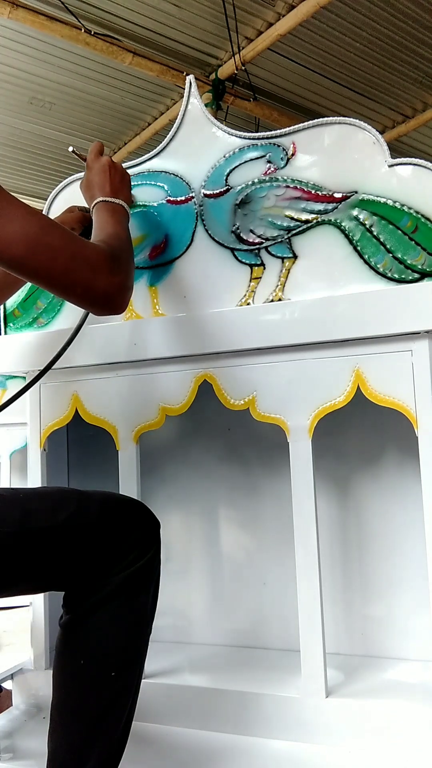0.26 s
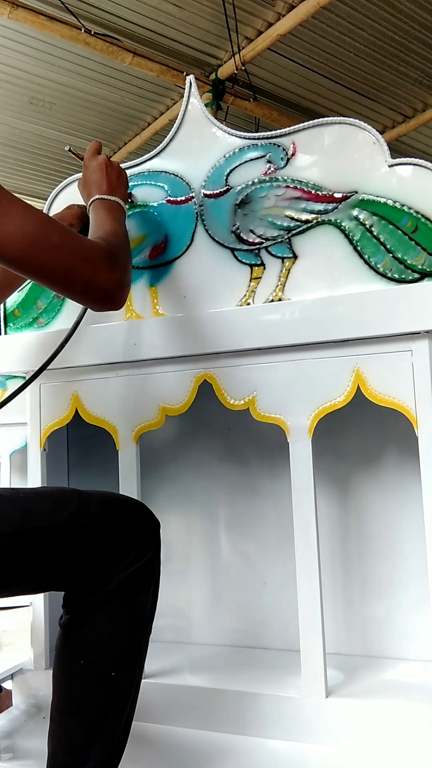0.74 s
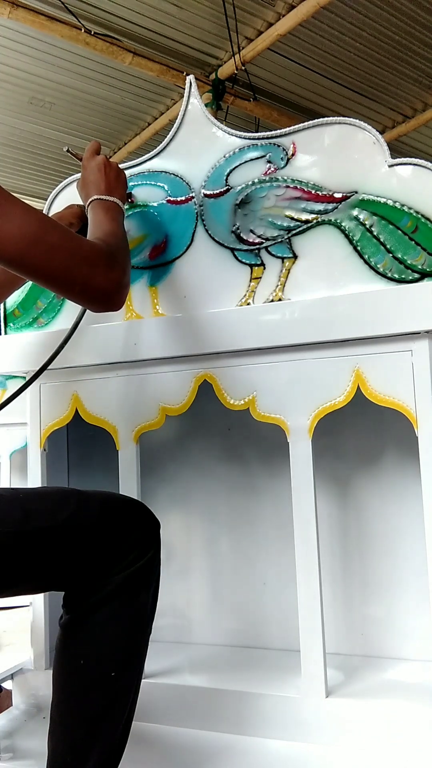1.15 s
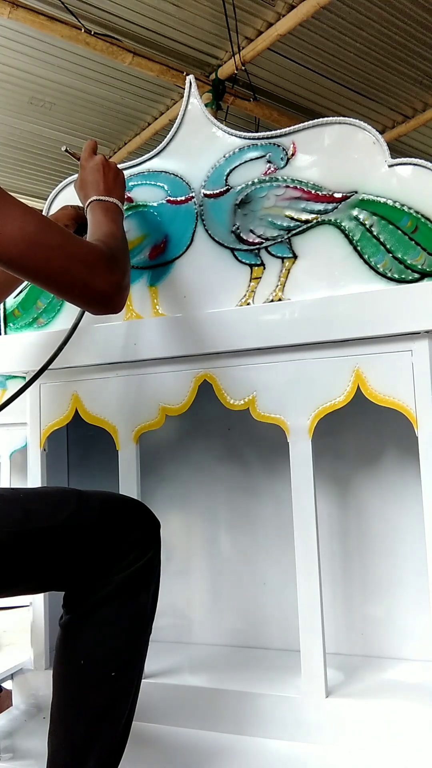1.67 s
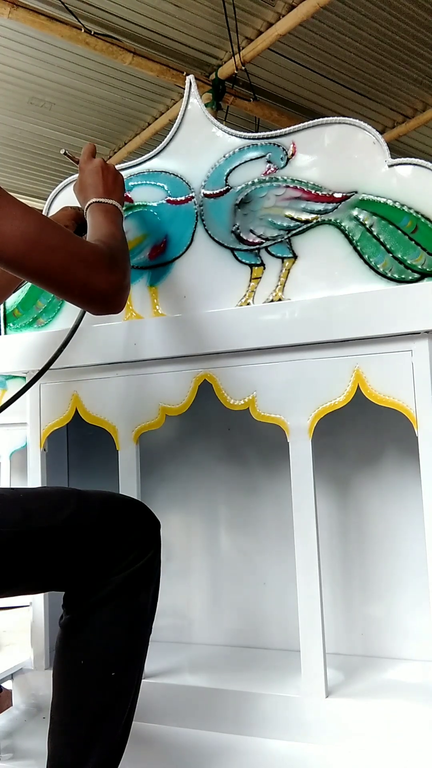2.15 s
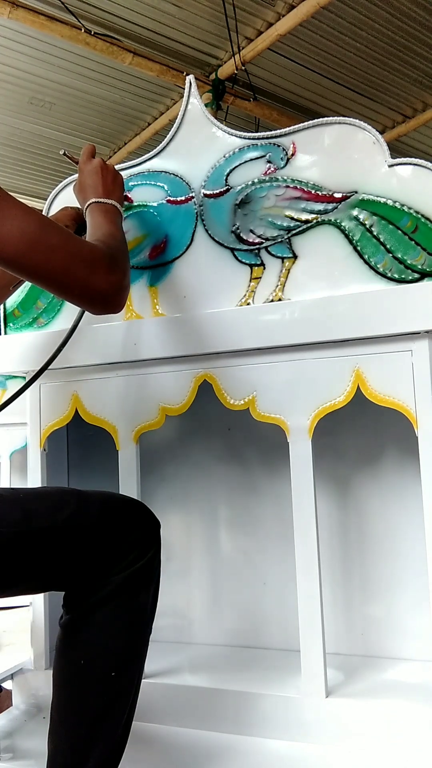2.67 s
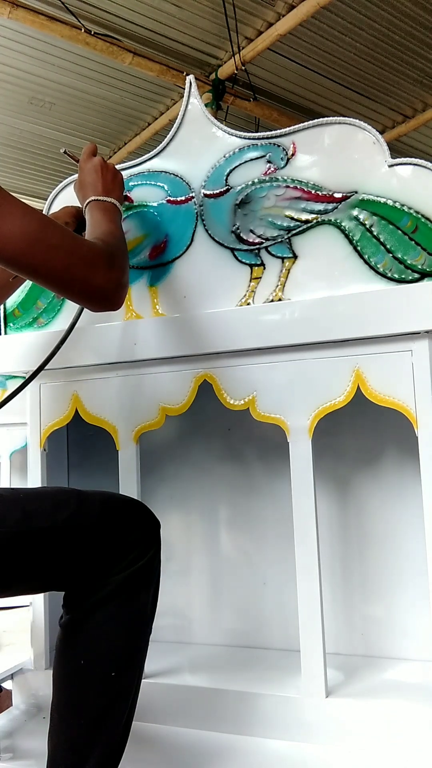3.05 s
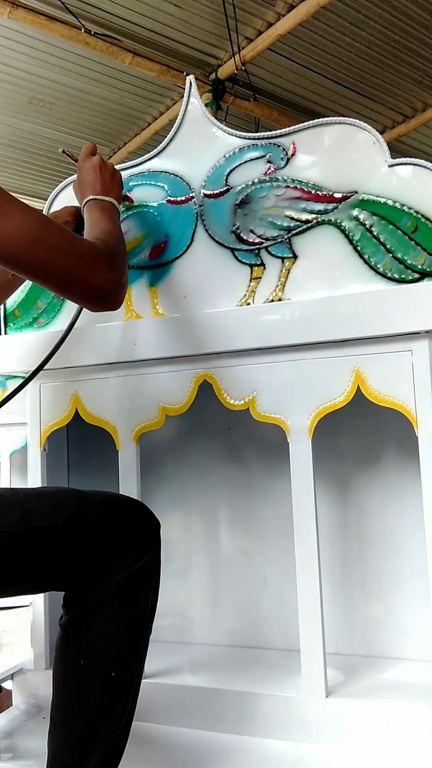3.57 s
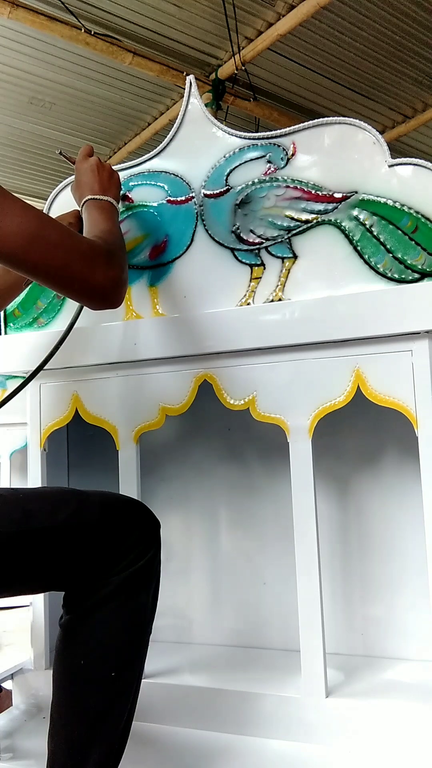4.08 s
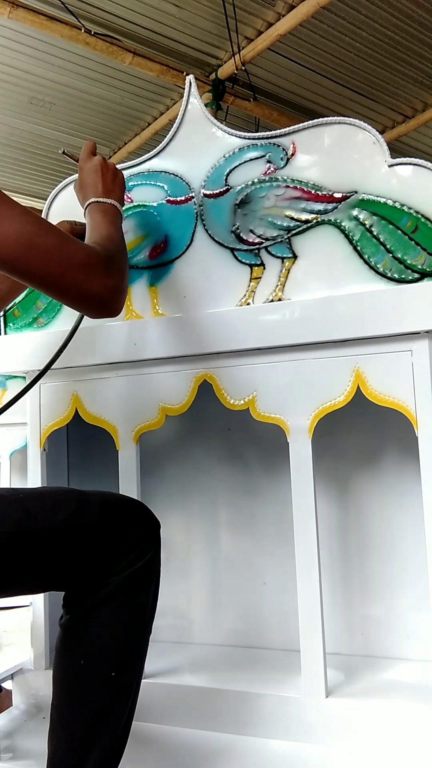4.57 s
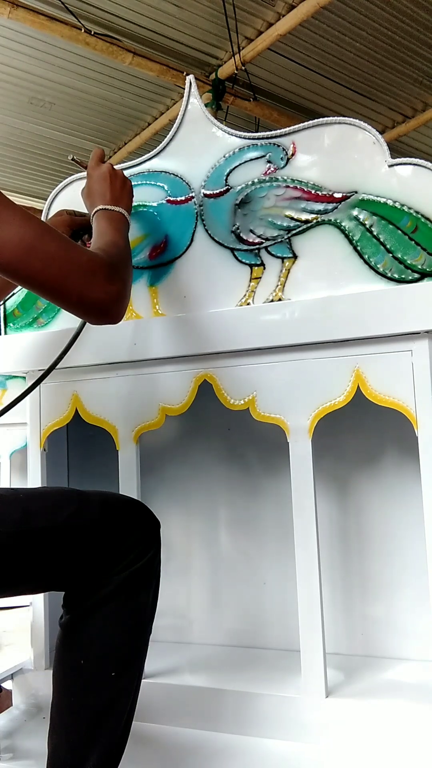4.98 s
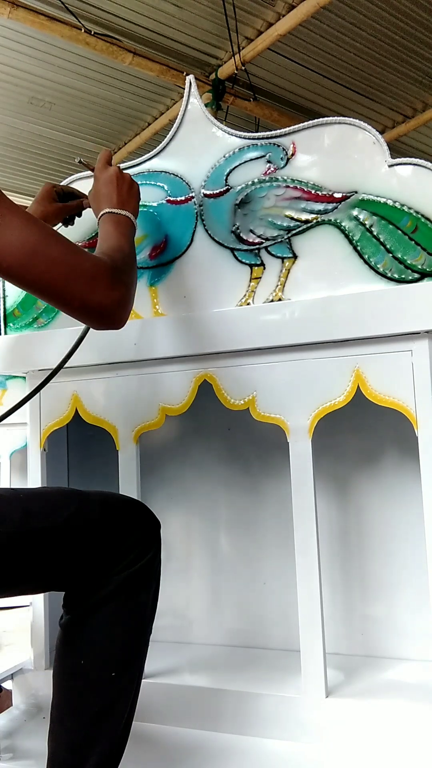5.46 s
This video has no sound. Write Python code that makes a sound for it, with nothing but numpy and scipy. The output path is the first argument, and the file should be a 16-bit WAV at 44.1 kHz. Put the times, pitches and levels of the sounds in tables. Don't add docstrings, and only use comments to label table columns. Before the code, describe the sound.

A small piston compressor drones steadily nearby, a low buzzing hum with fine valve rattle, leaking air and a faint high whine. After nearly a second an airbrush gives a short, even hiss, then stops cleanly. Following a pause, a second longer burst grows brighter and much louder before cutting off. Close stereo pickup at arm's length, under a tin roof, with a very short diffuse tail.

```python
import sys
import numpy as np
from scipy import signal
from scipy.fft import rfft, irfft, next_fast_len
from scipy.io import wavfile
from scipy.ndimage import uniform_filter1d

SR = 44100
rng = np.random.default_rng(int(sys.argv[2]) if len(sys.argv) > 2 else 0)


def digitize_waveform(pressure):
    field = np.atleast_2d(pressure).T
    bounded = np.clip(field, -1, 1)
    quanta = np.round(bounded * 32767).astype(np.int16)
    wavfile.write(sys.argv[1], SR, quanta)


def voltage_ratio(decibels):
    exponent = np.asarray(decibels, float) / 20
    return 10 ** exponent


N = 252693
TIME = np.arange(N) / SR
LONG = next_fast_len(N, True)
FREQ = np.fft.rfftfreq(LONG, 1 / SR)

# [t/s, f/Hz]
SHAFT_RATE = [
    (0.0, 46.1),
    (0.06, 46.12),
    (5.73, 46.08),
]
# [multiple of shaft rate, left level/dB, right level/dB]
PISTON_THUD = [(1, -58, -58), (2, -54, -55), (3, -67, -74), (4, -53, -53), (5, -48, -47), (6, -51, -52),
               (7, -50, -53), (8, -46, -45), (9, -49, -49), (10, -43, -45)]
# [multiple of shaft rate, left level/dB, right level/dB, left lead/rad]
HOUSING_TONES = [(12, -59, -61, 0.9), (13, -51, -57, 0.0), (14, -55, -62, 1.6), (15, -48, -65, -3.0),
                 (17, -57, -59, 0.2), (18, -61, -57, -0.7), (19, -51, -60, 0.5), (21, -48, -59, 2.2),
                 (23, -56, -57, 2.7), (24, -46, -57, 1.1), (25, -52, -50, 0.4), (27, -60, -61, -0.7),
                 (28, -55, -53, 2.1), (29, -52, -54, 1.2), (30, -52, -62, 0.7), (32, -58, -65, 2.1),
                 (33, -58, -61, -0.7), (39, -57, -60, 1.4), (42, -54, -72, 0.9), (47, -62, -61, 1.8),
                 (49, -61, -69, 0.8)]
# [t/s, level change/dB]
HOUSING_SWELL = [
    (0, -5),
    (1, 1.5),
    (2.1, -1),
    (2.6, 3.5),
    (3.3, 6.5),
    (4.2, 5),
    (4.8, 3.5),
    (5.73, 4),
]
# [f/Hz, level/dB]
VALVE_RATTLE = [(400, -55), (1500, -76), (2500, -65.5), (3200, -65.5), (5000, -71.5), (7500, -77),
                (8300, -62.5), (8900, -49.5), (9300, -72.5), (10000, -64), (12000, -100)]
# [f/Hz, bandwidth/Hz, left level/dB, right level/dB]
VALVE_REEDS = [(8425, 10, -55, -56), (8811, 5, -60, -50), (9128, 25, -56, -55)]
# [f/Hz, left level/dB, right level/dB]
WORKSHOP_NOISE = [(25, -92, -90), (65, -85, -79), (144, -101, -87), (302, -73, -79), (700, -78, -86.5),
                  (1150, -75.5, -76.5), (2540, -78, -83.5), (2980, -77.5, -81.5), (5300, -84.5, -84.5),
                  (9280, -69.5, -73), (9400, -70, -77), (10820, -79.5, -85), (12200, -86.5, -89.5),
                  (14300, -87.5, -104)]
# [t/s, jet level/dB]
TRIGGER_PULLS = [
    [(.832, -27.5), (.9, -26), (1.1, -24.5), (1.126, -24), (1.15, -24.5), (1.45, -24), (1.595, -24)],
    [(3.3, -27.5), (3.335, -24), (3.45, -25.5), (3.78, -21), (3.93, -23), (4.06, -16), (4.2, -17),
     (4.305, -17)],
]
# [f/Hz, left level/dB, right level/dB]
JET_HISS = [(1000, -30, -30), (2000, -20, -20), (2600, -24, -23), (3100, -17, -16), (3600, -15, -15),
            (4100, -16, -15.5), (4700, -11.5, -11), (5800, -9, -9), (6250, -13, -12), (7000, -6.5, -6),
            (8800, -4, -2), (10300, -7, -7), (11700, -1, -5.5), (13100, -13, -13), (14100, -8, -13)]
# [f/Hz, likeness (0-1), left lead/turns]
JET_PATHS = [(1000, .6, 0), (2700, .6, 0), (3100, .6, .25), (3500, .93, .46), (4500, .97, .5),
             (5600, .93, .54), (6280, .95, 1), (6900, .4, 1.1), (8000, .2, 1.5), (9400, .55, 2),
             (11300, .4, 2.5), (13000, .2, 3)]
# [t/s, bias drop level/dB]
PORT_OVERLOADS = [
    (4.059, -30),
    (4.112, -32),
    (4.154, -32),
    (4.205, -31),
    (4.262, -33),
]


def on_log(hz, table, column):
    rows = np.array(table, float)
    return np.interp(np.log(hz + 1), np.log(rows[:, 0]), rows[:, column])


def unit(x):
    return x / np.sqrt(np.mean(x ** 2, axis=-1, keepdims=True))


def walk(rate):
    hold = max(int(SR / rate), 1)
    held = rng.standard_normal(4000)[np.arange(N) // hold % 4000]
    return unit(uniform_filter1d(uniform_filter1d(held, hold), hold))


def pair(likeness, lead_turns):
    a, b = rfft(rng.standard_normal((2, LONG)))
    c = np.clip(likeness, 0, 1)
    left = a * np.exp(2j * np.pi * lead_turns)
    right = c * a + np.sqrt(1 - c ** 2) * b
    return np.array([left, right])


def restless(spectrum, centres, shared_db, own_db, rate):
    out = 0
    for k, hz in enumerate(centres):
        share = np.interp(FREQ, centres, np.arange(len(centres)) == k)
        band = irfft(spectrum * share, LONG)[:, :N]
        out = out + band * voltage_ratio(shared_db(hz) + own_db * walk(rate))
    return out


def resonance(centre_hz, width_hz):
    return 1 / (1 + (2 * (FREQ - centre_hz) / width_hz) ** 2)


def turn(tones, turns):
    size = 1 << 14
    waves = irfft(tones, size) * size / np.sqrt(2)
    points = np.arange(size + 1)
    return np.array([np.interp(turns % 1 * size, points, np.append(wave, wave[0])) for wave in waves])


def rattle_tones(order, shaft_hz):
    draw = rng.standard_normal((2, 2, len(order)))
    level = voltage_ratio(on_log(order * shaft_hz, VALVE_RATTLE, 1))
    return level * (draw[0] + 1j * draw[1]) / np.sqrt(2) * (order > 9)


def compressor():
    s, hz = np.transpose(SHAFT_RATE)
    turns = np.cumsum(np.interp(TIME, s, hz) + 0.0194 * walk(6)) / SR
    order = np.arange(280)
    tones = rattle_tones(order, hz.mean())
    start = .832 * order ** 2
    thud = [(*row, 0.01 * row[0]) for row in PISTON_THUD]
    for k, left_db, right_db, lead in thud + list(HOUSING_TONES):
        k = int(round(k))
        phase = start[k] + np.array([lead, 0])
        tones[:, k] = voltage_ratio(np.array([left_db, right_db])) * np.exp(1j * phase)
    out = turn(tones, turns)

    swell = voltage_ratio(np.interp(TIME, *np.transpose(HOUSING_SWELL))) - 1
    out += swell * turn(tones * (order == 25), turns)

    drift = 1.05 * walk(1.515)
    first = turn(rattle_tones(order, hz.mean()), turns)
    second = turn(rattle_tones(order, hz.mean()), turns)
    out += voltage_ratio(-1.0) * (np.sin(drift) * first + np.cos(drift) * second)
    return out


def reeds():
    out = 0
    for hz, width_hz, left_db, right_db in VALVE_REEDS:
        ring = irfft(pair(0.44, 0) * resonance(hz, width_hz), LONG)[:, :N]
        out = out + unit(ring) * voltage_ratio(np.array([[left_db], [right_db]]))
    return out


def shop():
    colour = voltage_ratio(np.array([on_log(FREQ, WORKSHOP_NOISE, 1), on_log(FREQ, WORKSHOP_NOISE, 2)])) * np.sqrt(SR / 2)
    swell = walk(1.17)
    centres = np.array([0, 300, 900, 2000, 4000, 6500, 9000, 11500, 15000.])
    likeness = 0.044 + 0.87 / (1 + (FREQ / 600) ** 4)
    return restless(pair(likeness, 0) * colour, centres, lambda hz: 0.14 * swell, own_db=1.4, rate=11)


def trigger():
    open_db_per_s, shut_db_per_s = 800, 900
    jet_db, left_s = np.full(N, -120.), np.zeros(N)
    for pull in TRIGGER_PULLS:
        s, db = np.transpose(pull)
        opening_db = open_db_per_s * np.maximum(s[0] - TIME, 0)
        shutting_db = shut_db_per_s * np.maximum(TIME - s[-1], 0)
        edge_db = opening_db + shutting_db
        jet_db = np.maximum(jet_db, np.interp(TIME, s, db) - edge_db)
        left_s = np.where(TIME > s[0] - .2, s[-1] - TIME, left_s)
    return jet_db, left_s


def airbrush():
    jet_db, left_s = trigger()
    push = np.clip(jet_db + 24, -10, 10)
    tilt = -0.42 + 0.1415 * push
    ring_db = -0.6 + 0.37 * push - 8 * np.clip(1 - left_s / 0.13, 0, 1)

    noise = pair(on_log(FREQ, JET_PATHS, 1), on_log(FREQ, JET_PATHS, 2))
    colour = voltage_ratio(np.array([on_log(FREQ, JET_HISS, 1), on_log(FREQ, JET_HISS, 2)]))
    colour /= np.sqrt(np.mean(colour ** 2, axis=1, keepdims=True))
    colour[1] *= voltage_ratio(-4 / (1 + np.exp((11600 - FREQ) / 300)))

    sputter = 1.0 * walk(25.24) + 0.36 * walk(160)
    centres = np.array([1000, 2500, 4000, 5500, 7000, 8500, 10000, 11500, 13000, 14500.])
    jet = restless(noise * colour, centres, lambda hz: sputter + tilt * np.log2(hz / 9000), own_db=0.22, rate=23)
    cavity = resonance(9440, width_hz=370)
    jet[0] += unit(irfft(noise[0] * cavity, LONG)[:N]) * voltage_ratio(-12 + ring_db + sputter)
    pan_db = 4
    return jet * voltage_ratio(jet_db + 2.0 + np.array([[pan_db], [-pan_db]]) / 2) + spatter(jet_db)


def spatter(flow_db):
    centres = np.arange(3000, 6200, 450.)
    band = (FREQ > 3300) & (FREQ < 5700)
    noise = rfft(rng.standard_normal((1, LONG))) * band
    return voltage_ratio(flow_db - 17) * restless(noise, centres, lambda hz: 0, own_db=5.0, rate=16)


def room(x):
    t60_s, level_db = .23, -7
    t = np.arange(SR // 2) / SR
    decay = np.exp(-np.log(1000) * t / t60_s) * (t > .006)
    tail = rng.standard_normal((2, len(t))) * decay
    tail *= voltage_ratio(level_db) / np.sqrt(np.sum(tail ** 2, axis=1, keepdims=True))
    return signal.fftconvolve(x, tail, axes=1)[:, :N]


def scene():
    steady = compressor() + reeds() + shop()
    jet = airbrush()
    return steady + jet + room(jet)


def band_limit(x):
    return signal.sosfilt(signal.butter(12, 14260, fs=SR, output="sos"), x)


def record(dry):
    wet = dry.copy()
    for s, db in PORT_OVERLOADS:
        after = np.maximum(TIME - s, 0)
        wet[0] -= voltage_ratio(db) * (1 - np.exp(-after / .002)) * np.exp(-after / 0.041)
    low_pass = signal.ellip(10, .3, 70, 14270, fs=SR, output="sos")
    mix = signal.sosfilt(low_pass, wet)
    return band_limit(mix)


dry = scene()
out = record(dry)
digitize_waveform(out)
```